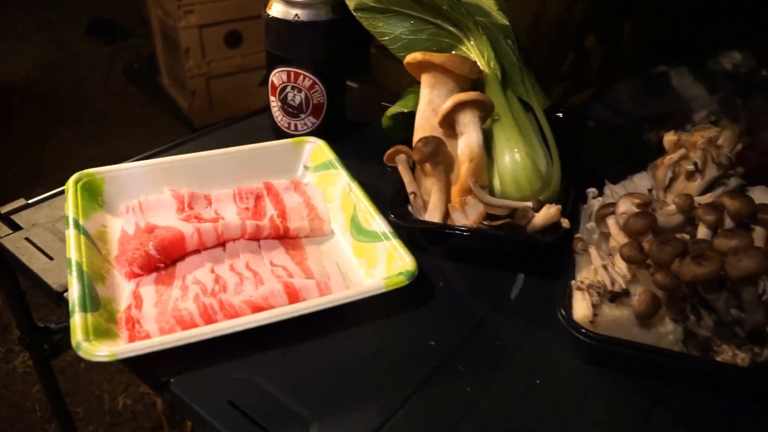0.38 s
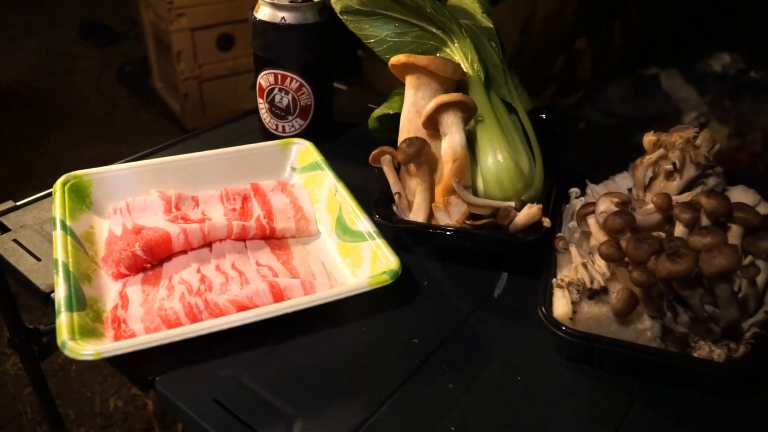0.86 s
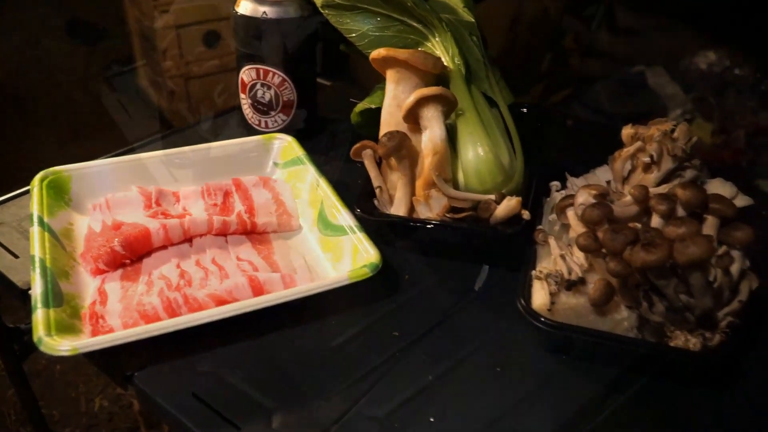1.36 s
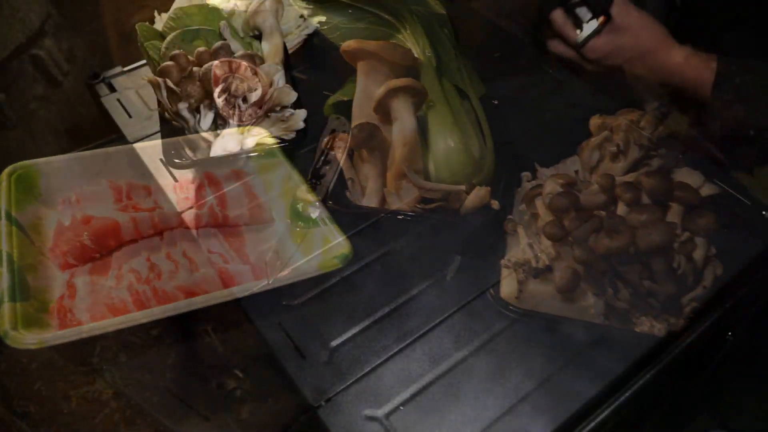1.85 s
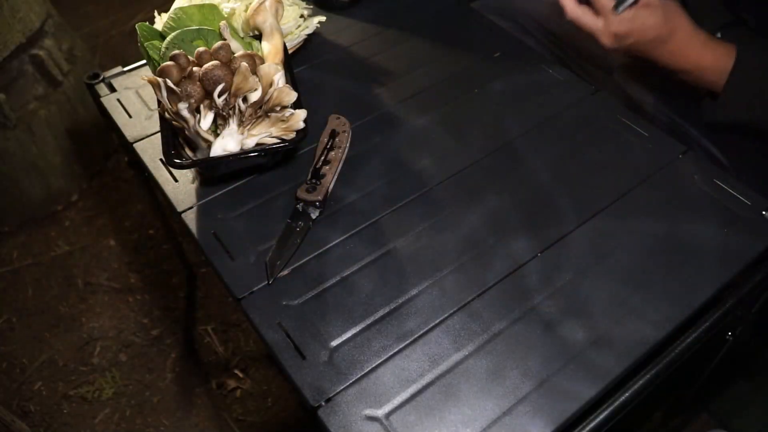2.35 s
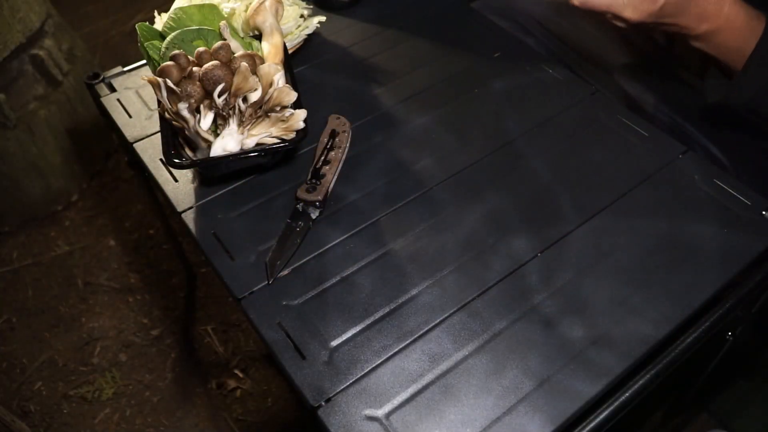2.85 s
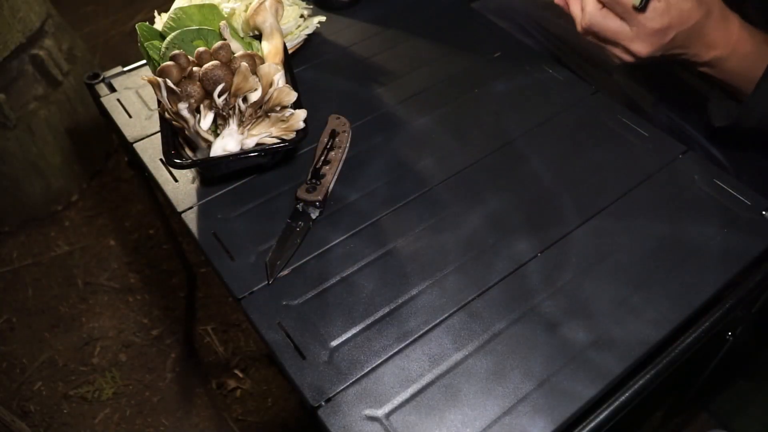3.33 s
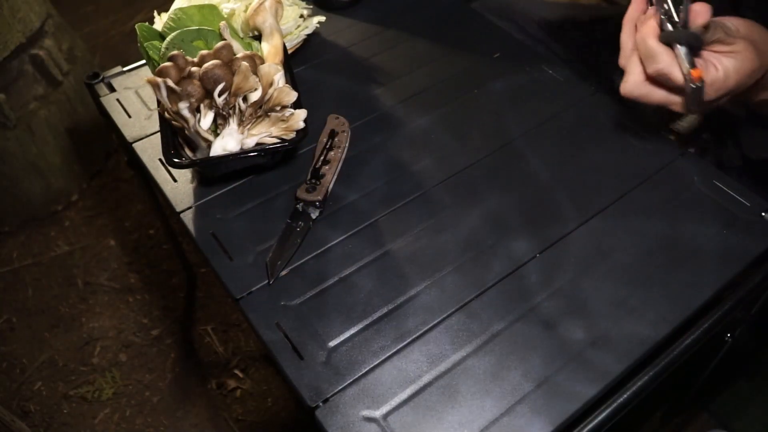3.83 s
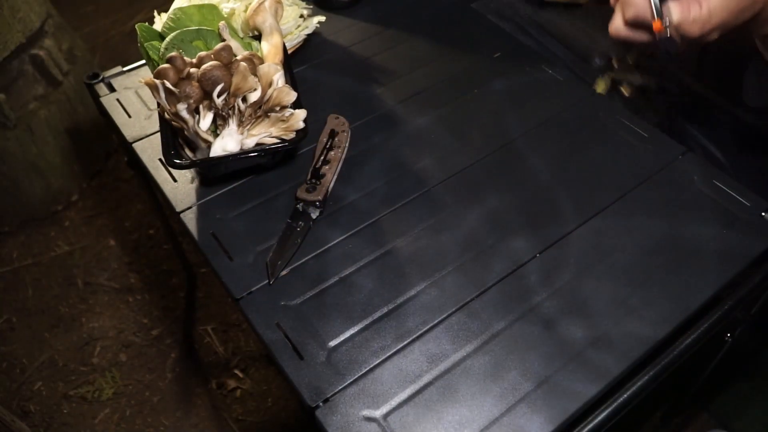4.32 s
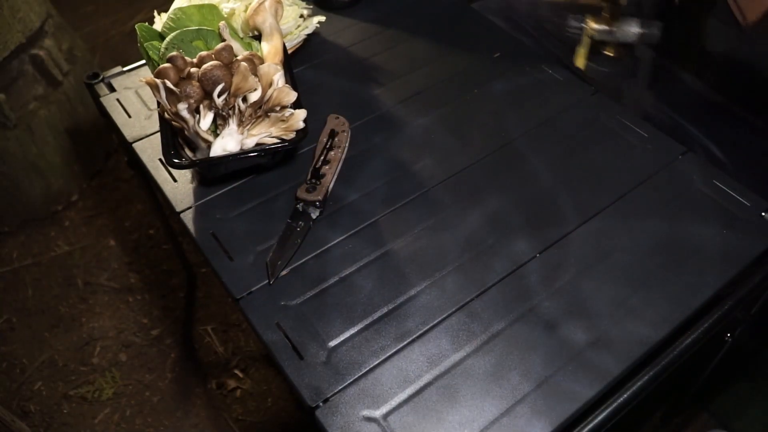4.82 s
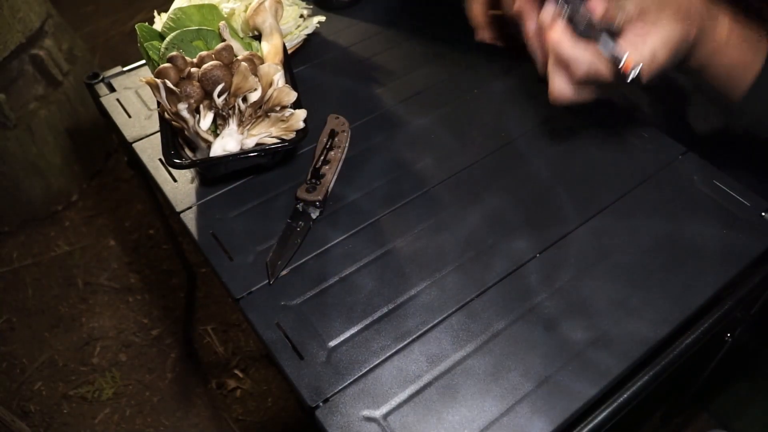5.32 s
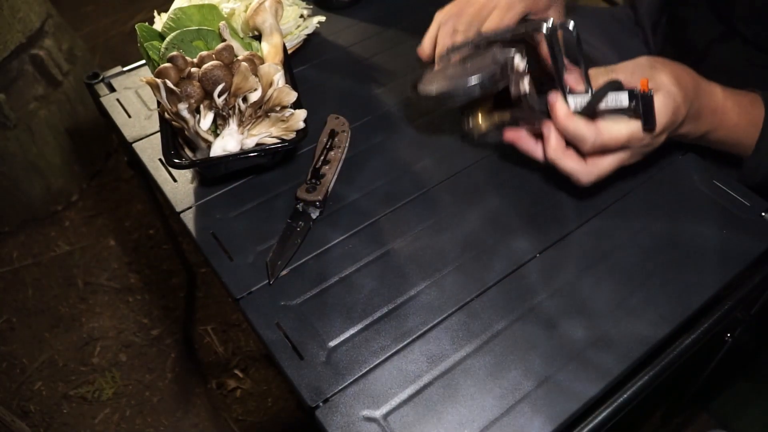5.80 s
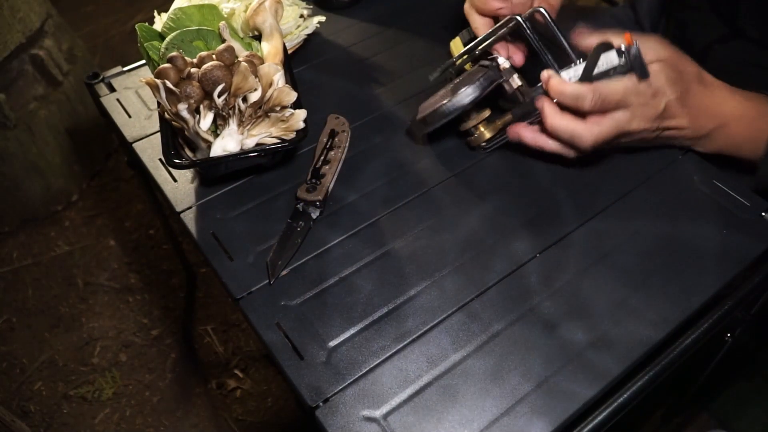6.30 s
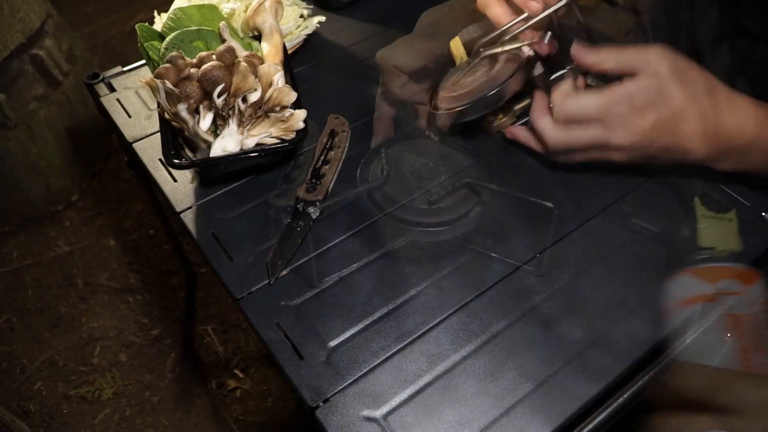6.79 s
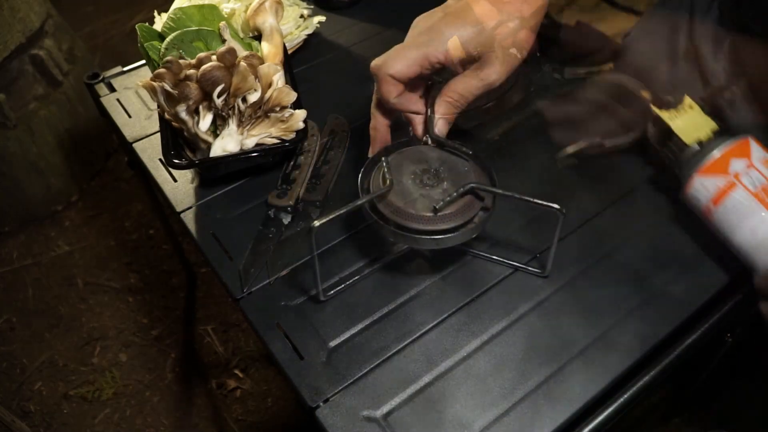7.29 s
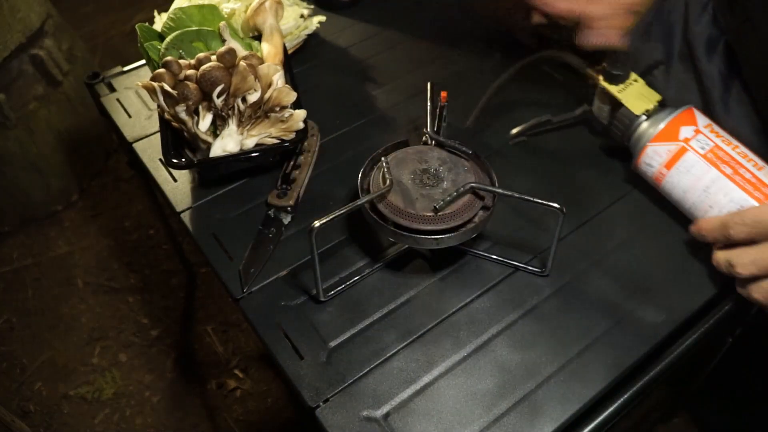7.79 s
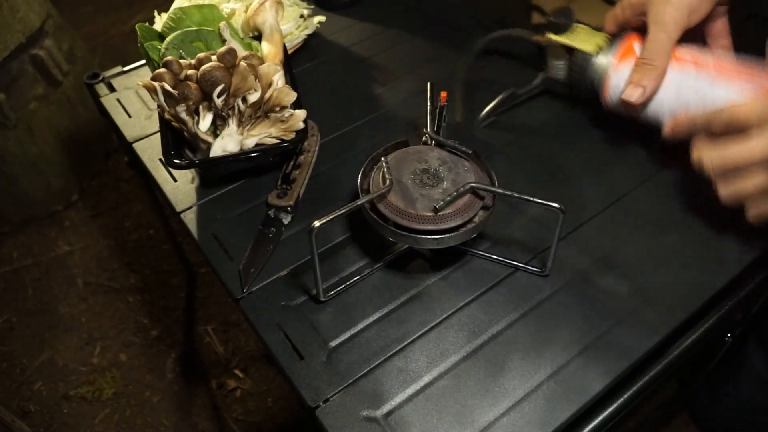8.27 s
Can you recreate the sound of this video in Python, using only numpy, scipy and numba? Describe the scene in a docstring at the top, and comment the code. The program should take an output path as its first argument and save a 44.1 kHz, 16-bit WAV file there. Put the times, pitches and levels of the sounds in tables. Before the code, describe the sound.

Close, dry stereo handling sounds sit slightly right over a low steady hush. Night air dies away early under a hissing pull on a cloth pouch. Metal clinks and a hard burst of knocks on a thin metal table follow, then sparse taps, then a busier rattle of wire legs with boomy table thumps. Last come dull hollow can knocks, dragging and light hissy brushing.

```python
"""Camp burner on a metal table

At a sheet-metal table at night, a folding burner is drawn from its cloth pouch, shaken open and knocked about;
then a gas can is dragged across. Noise-like blows and rubbing ring the modes of table, burner and can;
plucked parts sing on as decaying sines, and coloured noise makes the cloth, the hiss and the air.
A close stereo microphone hears the handling from the right; a wider night murmur fades away early on."""
import sys
import numpy as np
from numba import njit
from scipy import signal
from scipy.fft import rfft, irfft, next_fast_len
from scipy.io import wavfile
from scipy.ndimage import uniform_filter1d

SR = 44100
rng = np.random.default_rng(int(sys.argv[2]) if len(sys.argv) > 2 else 0)


def wav_record(signal):
    """Record a signal, one row per channel, as 16-bit PCM in the file named by sys.argv[1]."""
    frames = np.transpose(np.atleast_2d(signal))
    bounded = np.clip(frames, -1, 1)
    # unit amplitude maps onto the largest positive 16-bit level
    quanta = np.round(bounded * 32767).astype(np.int16)
    wavfile.write(sys.argv[1], SR, quanta)


def to_linear_factor(level_db):
    """Convert decibel levels (scalar or array-like) to linear amplitude factors."""
    exponent = np.asarray(level_db, float) / 20
    return 10 ** exponent


N = 381288
T = np.arange(N) / SR

# Event levels below are before the trim of each part; resonance and colour levels are relative.
# spectral colours of night murmur and steady hush: [pitch_hz, level_db]
NIGHT_COLOUR = [(12, -15), (20, -1), (124, -1), (281, -6.5), (393, -2.5), (839, -11), (1110, -8),
                (12500, -17), (15200, -17), (16500, -45)]
HUSH_COLOUR = [(12, -47), (20, 4.5), (382, -7), (2240, -16), (5360, -30.5), (14700, -38.5), (16500, -47)]
# the murmur fading away: [time_s, level_db]
NIGHT_FADE = [(0, 3.5), (1.4, 3), (1.9, -3.5), (2.3, -33)]
# thin high tones in the distance: [pitch_hz, level_db]
THIN_TONES = [(9711, -71.5), (12947, -73)]
# faint far whistle: [time_s, pitch_hz, level_db]
FAR_WHISTLE = [(1.22, 1250, -81), (1.27, 1270, -56), (1.34, 1330, -55), (1.4, 1260, -60)]
# pull on the cloth pouch: [time_s, level_db]
POUCH_PULL = [(1.5, -61), (1.85, -58.5), (1.98, -48), (2.12, -44.5), (2.2, -48), (2.4, -40.5), (2.67, -41),
              (2.73, -48.5), (3.0, -49), (3.06, -41.5), (3.2, -45), (3.36, -50), (3.56, -34)]
# spectral colours of rubbing cloth and hiss, and of dense lesser modes: [pitch_hz, level_db]
CLOTH_COLOUR = [(88, -20), (150, -8), (814, -6.5), (953, -10.5), (1070, -6.5), (2180, 1), (5380, -4.5),
                (14700, 1), (15600, 6), (16500, -84)]
CLATTER_COLOUR = [(120, 16), (270, -23), (600, 46), (1500, -20), (5000, -24.5), (16000, -13)]
# free-ringing parts: [pitch_hz, level_db, t60_s]
LEG = [(775, -15, .8), (1389, -13, .4), (2164, -12, .55), (2810, -3, 0.9), (4750, -3, .12), (6350, -14, .9),
       (7036, 0, .15)]
BAR = [(554, 2, 0.8), (2272, -7, 0.55)]
PANEL = [(206, -5.5, 0.55), (267, 1, 0.45)]
PINS = [(6000, 2, 0.53), (7800, -8, .3), (9100, 8, 0.22)]
HINGE = [(2840, 4, 0.074), (5520, -1, 0.044)]
SHELL = [(942, -7, .15), (1390, -3, .09), (1550, -1, .06), (1950, 0, .07)]
LATCH = [(2950, 0, .07), (3590, -3, .05), (5600, -9, .07)]
# plucks of those parts: [start_s, part, level_db]
PLUCKS = [(1.56, LATCH, -36.5), (3.588, LEG, -34), (3.785, BAR, -31.5), (4.189, PANEL, -41),
          (4.528, PANEL, -38), (4.94, SHELL, -37), (4.995, SHELL, -34), (5.92, PINS, -55),
          (6.254, PINS, -56), (6.523, HINGE, -35), (6.602, HINGE, -44.5), (6.848, HINGE, -36),
          (6.937, HINGE, -38.5), (7.302, HINGE, -46)]
# blows: [start_s, table_level_db, burner_level_db, clink_level_db, favoured_pitch_hz]
BLOWS = [(1.559, -61, -39.5, -50, 3040), (1.713, -59, -44, -42.5, 4500), (1.947, -50, -44, -35.5, 3770),
         (1.971, -60, -33.5, -42, 2240), (3.584, -34.5, -21.5, -38, 2800), (3.598, -62, -43, -24, 6320),
         (3.62, -59, -36, -20.5, 6000), (3.769, -21.5, -14.5, -17.5, 234),
         (3.869, -18.5, -23.5, -31.5, 263), (4.05, -14.5, -16, -24, 278), (4.12, -14, -31.5, -44, 245),
         (4.154, -17, -35.5, -52, 256), (4.181, -22, -38.5, -56, 256), (4.526, -35, -40, -50, 245),
         (4.555, -33.5, -23.5, -36.5, 5200), (4.633, -32, -36.5, -42, 254), (4.736, -48.5, -38, -52, 1408),
         (4.942, -43, -28.5, -48, 1690), (4.997, -38, -33, -47, 1190), (5.216, -45.5, -68, -60, 744),
         (5.556, -24.5, -21.5, -35, 630), (5.632, -43, -33, -35.5, 675), (5.767, -16.5, -32, -45, 520),
         (5.827, -14, -15, -24.5, 550), (5.847, -11.5, -13.5, -23, 546), (5.918, -11, -19.5, -33, 213),
         (5.998, -8, -15, -36, 302), (6.009, -20, -18, -28, 307), (6.031, -11, -27, -54, 387),
         (6.17, -34, -27, -24, 9000), (6.18, -13.5, -13.5, -26, 500), (6.213, -11.5, -13.5, -24.5, 590),
         (6.253, -50, -43, -30.5, 1140), (6.376, -12, -16, -29.5, 580), (6.519, -28.5, -31.5, -23, 503),
         (6.603, -34.5, -41.5, -43, 510), (6.753, -50, -33, -28.5, 3040), (6.8, -22.5, -47, -64, 380),
         (6.845, -24, -43, -54, 470), (6.863, -14, -27.5, -52, 540), (7.018, -24, -17.5, -28, 2550),
         (7.049, -20, -29, -35, 554), (7.106, -20, -39, -50, 800), (7.128, -35, -23.5, -46, 950),
         (7.17, -24.5, -31, -55, 900), (7.195, -22.5, -22.5, -44, 1930), (7.218, -21, -24, -50, 600),
         (7.235, -24.5, -23, -31.5, 620), (7.284, -26, -35, -47, 760), (7.44, -55, -40, -64, 2540),
         (7.668, -19, -18, -33, 860), (7.891, -12.5, -21.5, -64, 1110), (7.954, -27, -27, -60, 836),
         (8.019, -25.5, -24.5, -39, 1030), (8.126, -31, -48, -42, 1120), (8.212, -39, -50, -60, 760),
         (8.272, -20, -34.5, -56, 1160), (8.351, -23, -43, -50, 650), (8.454, -21, -42, -35, 387),
         (8.504, -19, -37, -53, 790), (8.621, -28.5, -52, -55, 587)]
# shoves that swell and fade: [peak_s, table_level_db, burner_level_db, hiss_level_db, fade_s]
SHOVES = [(1.951, -60, -54, -27.5, 0.0036), (2.23, -47.5, -43, -32, 0.018), (3.555, -35, -27.5, -26, 0.014),
          (3.802, -28.5, -22.5, -29.5, 0.016), (5.612, -54, -35, -43, 0.013),
          (5.795, -23, -41.5, -46, 0.029), (7.088, -30.5, -29, -37.5, 0.025),
          (7.304, -31.5, -37, -48, 0.024), (8.379, -18, -24, -36, 0.018), (8.423, -41, -28.5, -32, 0.018)]
# drags over the table: [start_s, end_s, start_level_db, end_level_db]
DRAGS = [(3.81, 3.85, -40, -27), (4.063, 4.189, -24.5, -40.5), (4.952, 5.068, -47, -52),
         (5.57, 6.18, -35.5, -42.5), (6.26, 6.55, -46.5, -40.5), (6.653, 6.784, -53.5, -37),
         (6.81, 7.13, -36, -34.5), (7.34, 7.655, -49, -57.5), (7.68, 8.113, -45.5, -31),
         (8.204, 8.65, -39, -41)]
# hands and hose brushing the parts: [time_s, level_db]
HANDS = [(3.56, -31), (3.62, -41), (3.9, -47), (4.1, -55), (4.28, -49), (4.5, -53), (5.1, -51),
         (5.5, -58.5), (5.6, -48.5), (6.12, -60), (6.66, -62), (6.95, -46), (7.38, -54.5), (7.75, -47),
         (7.87, -47.5), (8.1, -37), (8.3, -41.5), (8.52, -31.5), (8.58, -42), (8.65, -42)]
# resonances of each body, then the upper ones of the can: [pitch_hz, width_hz, level_db]
TABLE_MODES = [(187, 50, -4), (268, 36, 9), (325, 36, 5), (395, 30, 3), (500, 60, 0), (554, 20, 5),
               (675, 30, 2), (725, 46, 5), (920, 36, 3), (1178, 50, -1)]
BURNER_MODES = [(1483, 26, 4), (1550, 30, 0), (1752, 24, 3), (1997, 36, 3), (2190, 80, 1), (2316, 26, 5),
                (2594, 50, 4), (2810, 24, 2), (3018, 30, 5), (3260, 57, 4), (3452, 40, 3), (3748, 34, 3),
                (4078, 30, 2), (4300, 60, 3)]
CAN_MODES = [(301, 24, 9), (450, 60, -1), (550, 26, 7), (790, 70, 0), (885, 45, 3), (1040, 45, 1),
             (1135, 55, 2), (1360, 40, 2)]
CAN_TOP_MODES = [(1807, 39, -4), (2357, 60, 0.5), (2685, 48, 2.5), (3265, 88, 0), (4360, 74, 0.7)]

CAN_FROM_S = 7.6  # from here the can is struck and dragged
SCATTER_DB, WIRE_SCATTER_DB = 4, 4.5  # spread of mode levels between contact points
SLIPS_PER_S = 22  # how often the contact point jumps between blows


def unit(x):
    """Scale to rms 1."""
    return x / np.sqrt(np.mean(x ** 2))


def walk(rate):
    """Random levels of rms 1, each held for 1 / rate s and slewed into the next."""
    hold = int(SR / rate)
    levels = np.repeat(rng.standard_normal(N // hold + 1), hold)
    return unit(uniform_filter1d(levels, hold)[:N])


def curve(table, column):
    """Gain from a dB column, silent outside its times."""
    s, db = np.transpose(table)[[0, column]]
    return to_linear_factor(np.interp(T, s, db, left=-120, right=-120))


def colour(x, points, lo_hz=0.8, hi_hz=20000.):
    """Shape x by a spectral colour inside a soft-edged band, with unit gain for noise."""
    size = next_fast_len(N)
    hz = np.maximum(np.fft.rfftfreq(size, 1 / SR), 1)
    f, db = np.transpose(points)
    edges = np.sqrt((1 + (lo_hz / hz) ** 6) * (1 + (hz / hi_hz) ** 6))
    gain = to_linear_factor(np.interp(np.log(hz), np.log(f), db)) / edges
    gain = gain / np.sqrt(np.mean(gain ** 2))
    return irfft(rfft(x, size) * gain)[..., :N]


def band(x, lo_hz, hi_hz):
    """Each part radiates only its own range."""
    return signal.sosfilt(signal.butter(2, [lo_hz, hi_hz], "band", fs=SR, output="sos"), x)


def tilt(left_db):
    """Gains of the two channels, left_db apart: negative leans to the right."""
    return to_linear_factor(np.array([[left_db], [-left_db]]) / 2)


def ports(alike, left_db):
    """Noise at both microphone ports, partly shared; alike is their correlation."""
    shared, own = rng.standard_normal((2, N))
    alike = np.clip(alike, 0, 1)
    opposed = own * np.array([[1], [-1]])
    both = np.sqrt((1 + alike) / 2) * shared + np.sqrt((1 - alike) / 2) * opposed
    return both * tilt(left_db)


def air(points, wide_hz):
    """Smooth noise, alike in both ports only in the bass, below wide_hz."""
    mid, side = colour(rng.standard_normal((2, N)), points)
    side = signal.lfilter(*signal.butter(1, wide_hz, "high", fs=SR), side)
    return np.array([mid + side, mid - side])


def hush():
    """Steady wide noise, mostly bass, under everything."""
    return to_linear_factor(-63.5) * air(HUSH_COLOUR, 250.0)


def night():
    """Distant outdoor murmur with two thin wavering high tones and one faint far whistle."""
    tones = sum(to_linear_factor(db) * np.sin(2 * np.pi * hz * T) * to_linear_factor(2.1 * walk(14.6)) for hz, db in THIN_TONES)
    fade = to_linear_factor(np.interp(T, *np.transpose(NIGHT_FADE)))
    s, hz, _ = np.transpose(FAR_WHISTLE)
    phase = 2 * np.pi * np.cumsum(np.interp(T, s, hz)) / SR
    whistle = curve(FAR_WHISTLE, 2) * np.sin(phase)
    return (to_linear_factor(-56) * air(NIGHT_COLOUR, 160.0) + tones) * fade + whistle


def pouch():
    """Cloth drags over metal: a dull sweep and a fine hiss, both flickering."""
    flicker_db = 1.3
    pull = curve(POUCH_PULL, 1) * unit(to_linear_factor(2.1 * walk(900)))
    dull = colour(ports(0.58, -7.0), CLOTH_COLOUR, 130.0, 5500.0)
    sweep = to_linear_factor(-3.0) * pull * to_linear_factor(flicker_db * walk(30.41)) * dull
    fine = colour(ports(0.064, -6.5), CLOTH_COLOUR, 4300.0, 12600.0)
    hiss = to_linear_factor(-0.4) * pull * to_linear_factor(flicker_db * walk(21.85)) * fine
    return sweep + hiss


def plucked_parts():
    """Plucked parts ring on as lone decaying notes that waver slightly in level, to the right."""
    out = np.zeros(N)
    for s, part, pluck_db in PLUCKS:
        i = int(s * SR)
        age = T[:min(N - i, SR)]
        for hz, db, t60 in part:
            onset = 1 - np.exp(-age / (0.016 * t60))
            decay = np.exp(-np.log(1000) * age / t60)
            out[i:i + len(age)] += to_linear_factor(pluck_db + db) * onset * decay * np.sin(2 * np.pi * hz * age)
    return out * to_linear_factor(2.4 * walk(70)) * tilt(-3.0)


def drags():
    """Each drag sets in fast, holds and dies away; the powers of all drags add."""
    rise_db_s, fall_db_s = 1500, 188
    power = 0
    for start, end, first_db, last_db in DRAGS:
        db = np.interp(T, [start, end], [first_db, last_db])
        db = db - rise_db_s * np.clip(start - T, 0, 1) - fall_db_s * np.clip(T - end, 0, 1)
        power = power + to_linear_factor(2 * db)
    return np.sqrt(power)


def contact(axis, rub, boost_db, grit_db, scrape, snap_db, linger, alike, left_db):
    """Force on one part: blows snap and bounce, shoves swell and fade, rubbing pushes on with grit."""
    # a blow of middling strength rattles for base_t60_s times linger; harder ones a little longer
    base_t60_s, middling_db, doubling_db = 0.12, -21.5, 30
    sag = 0.76  # under 1: the first instants die fastest
    swell_per_fade = 1.2
    rattle, snaps = np.zeros(N), np.zeros(N)
    for row in BLOWS:
        i = int(row[0] * SR)
        t60 = linger * base_t60_s * 2 ** ((max(row[1:4]) - middling_db) / doubling_db)
        age = T[:min(N - i, SR // 2)]
        tail = np.exp(-np.log(1000) * (age / np.clip(t60, .01, .5)) ** sag)
        rattle[i:i + len(tail)] += (to_linear_factor(row[axis] + boost_db) * tail) ** 2  # powers add
        snaps[i] = to_linear_factor(row[axis] + snap_db)
    push = rub ** 2
    for row in SHOVES:
        middle = int(row[0] * SR)
        near = slice(middle - SR // 4, middle + SR // 4)
        width = row[4] * np.where(T[near] < row[0], swell_per_fade, 1)
        push[near] += to_linear_factor(2 * row[axis]) * np.exp(-((T[near] - row[0]) / width) ** 2)
    # loose parts touch in brief bounces, so the rattle is grainier than the rubbing
    bounces = unit(to_linear_factor(grit_db * walk(1500)))
    grit = unit(to_linear_factor(1.45 * walk(60)) * bounces ** scrape)
    blows = np.sqrt(rattle) * bounces * ports(alike, left_db) + snaps * tilt(left_db)
    rubbing = np.sqrt(push) * grit * ports(alike, left_db)
    return blows, rubbing


@njit(fastmath=True)
def resonate(force, spot, share, r, turn):
    """A bank of two-pole modes, each with unit gain for noise and its share at the current contact spot."""
    out, a, b = np.zeros(force.shape), 2 * r * np.cos(turn), r ** 2
    gain = share * np.sqrt((1 - b) / 2)
    for c in range(force.shape[0]):
        w1, w2 = np.zeros(len(r)), np.zeros(len(r))
        for i in range(force.shape[1]):
            x, g, total = force[c, i], gain[spot[i]], 0.
            for k in range(len(r)):
                w = g[k] * x + a[k] * w1[k] - b[k] * w2[k]
                total += w - w2[k]
                w2[k], w1[k] = w1[k], w
            out[c, i] = total
    return out


def body(force, modes, scatter_db, focus_db):
    """Ring the modes; the contact keeps jumping elsewhere and favours modes near the latest blow's pitch."""
    hz, width, db = np.transpose(modes)
    times = np.array([row[0] for row in BLOWS])
    slips = T[-1] * rng.random(int(SLIPS_PER_S * T[-1]))
    jumps = np.sort(np.concatenate([[0], times, slips]))
    latest = np.maximum(np.searchsorted(times, jumps, "right") - 1, 0)
    pitch = np.array([row[4] for row in BLOWS])[latest, None]
    octaves = np.minimum(np.abs(np.log2(hz / pitch)), 2)
    scatter = scatter_db * rng.standard_normal(octaves.shape)
    share = to_linear_factor(db + scatter - focus_db * octaves) * np.sqrt(width)  # focus_db is lost per octave
    share /= np.sqrt(np.sum(share ** 2, axis=1, keepdims=True))
    spot = np.searchsorted(jumps, T + 1 / SR) - 1
    # the tiny offset keeps the filters from stalling in silence
    return resonate(force + 1e-15, spot, share, np.exp(-np.pi * width / SR), 2 * np.pi * hz / SR)


def clatter(lo_hz, count):
    """Crowded lesser modes blur into broad bands a third of an octave apart."""
    hz = lo_hz * 2 ** (np.arange(count) / 3)
    f, db = np.transpose(CLATTER_COLOUR)
    return np.transpose([hz, 0.42 * hz, np.interp(np.log(hz), np.log(f), db)])


def thin_wires(count):
    """Many short high modes of the folding legs, spread unevenly over the treble."""
    hz = 3600.0 * 2.5 ** ((np.arange(count) + rng.random(count)) / count)
    return np.transpose([hz, hz / 90, 0 * hz])


def wire_joints(hands):
    """Blows clink the joints and thin legs; shoves and brushing hands hiss over them."""
    ticks, slide = contact(axis=3, rub=hands, boost_db=-1.3, grit_db=1.5, scrape=0.23, snap_db=-15.0,
                           linger=0.66, alike=0.024, left_db=-5.5)
    clink = band(body(ticks, clatter(5400.0, count=6), SCATTER_DB, 2.9), 2200.0, 12300.0)
    legs = to_linear_factor(-0.5) * body(ticks, thin_wires(count=24), WIRE_SCATTER_DB, .1)
    return clink + legs + colour(slide, CLOTH_COLOUR, 2030.0, 14500.0)


def table(low):
    """Sheet metal rings its clear modes over a dense clatter, with a bass thud."""
    clear = to_linear_factor(-4.0) * body(low, TABLE_MODES, SCATTER_DB, 7.2)
    dense = to_linear_factor(-13.5) * body(low, clatter(182.0, count=10), 1.0, 5.6)
    thud = to_linear_factor(-6.5) * band(low, 56.0, 89.0)
    return thud + band(clear + dense, 127.0, 1540.0)


def gas_can(low, mid):
    """The can rings its lower modes from the low force and its upper ones from the mid force."""
    shell = to_linear_factor(-1.0) * band(body(low, CAN_MODES, 4.9, 5.7), 237.0, 1370.0)
    top = to_linear_factor(-2.5) * band(body(mid, CAN_TOP_MODES, SCATTER_DB, 0.27), 750.0, 4840.0)
    return shell + top


def burner(mid, can):
    """The burner's clear modes ring until the can takes over; its dense clatter runs throughout."""
    clear = to_linear_factor(-4.0) * body(mid * ~can, BURNER_MODES, SCATTER_DB, 7.1)
    dense = to_linear_factor(-7.5) * body(mid, clatter(1430.0, count=6), SCATTER_DB, 5.1)
    return band(clear + dense, 750.0, 4840.0)


def metal():
    """The same blows and rubbing ring table or can, burner and wire joints; treble rattles die first."""
    drag, hands = drags(), curve(HANDS, 1)
    handled = np.hypot(to_linear_factor(-11.0) * drag, to_linear_factor(-15.0) * hands)
    shaken = np.hypot(handled, to_linear_factor(-9.0) * curve(POUCH_PULL, 1))
    low = sum(contact(axis=1, rub=drag, boost_db=-3.5, grit_db=3.5, scrape=0.33, snap_db=10.0,
                      linger=1.13, alike=0.97, left_db=-2.2))
    mid = sum(contact(axis=2, rub=shaken, boost_db=-2.5, grit_db=4.0, scrape=0.35, snap_db=-4.0,
                      linger=1.13, alike=0.47, left_db=-3.5))
    can = T > CAN_FROM_S
    return wire_joints(hands) + table(low * ~can) + gas_can(low * can, mid * can) + burner(mid, can)


def scene():
    """Handling sounds close on the right, over the night air."""
    background = hush() + night()
    close = pouch() + plucked_parts() + metal()
    return background + close


def band_limit(x):
    """A steep low-pass at the top of the band."""
    return signal.sosfilt(signal.butter(12, 16970, fs=SR, output="sos"), x)


def record(dry):
    """The stereo microphone signal is the finished mix."""
    return band_limit(dry)


dry = scene()
out = record(dry)
wav_record(out)
```